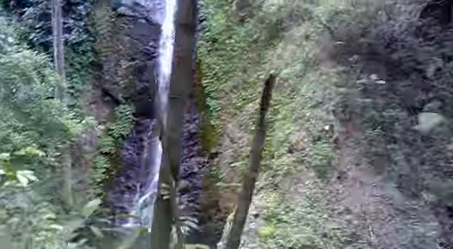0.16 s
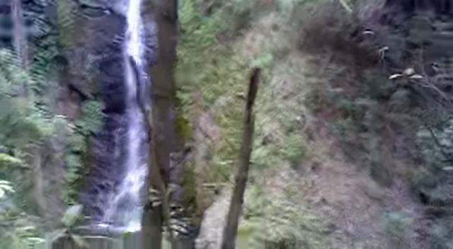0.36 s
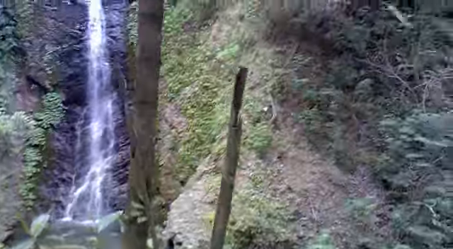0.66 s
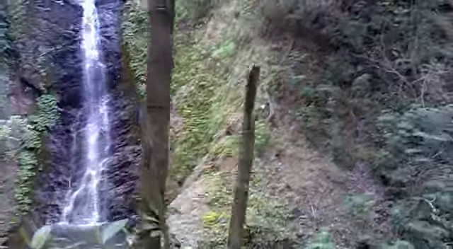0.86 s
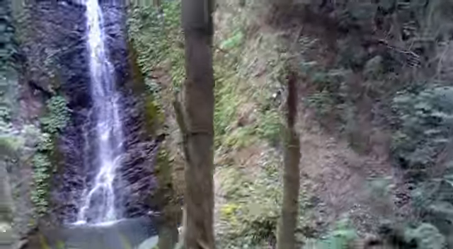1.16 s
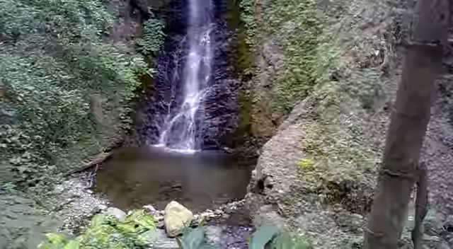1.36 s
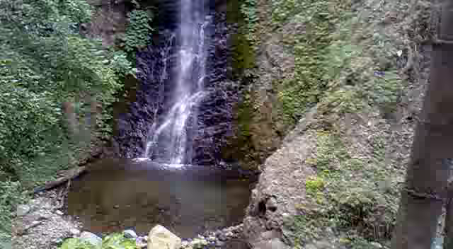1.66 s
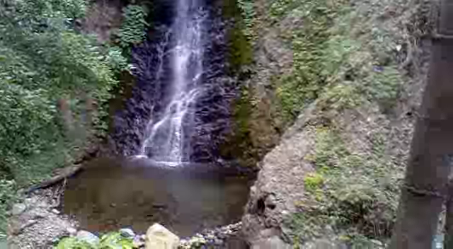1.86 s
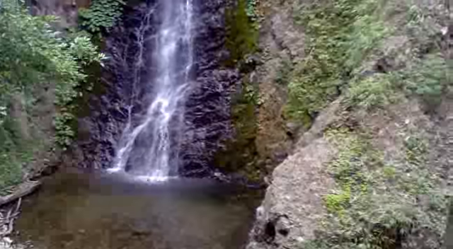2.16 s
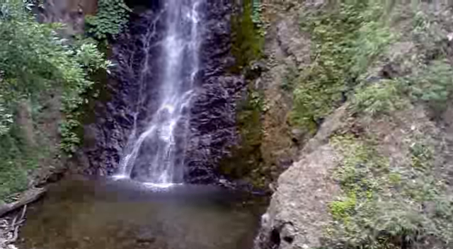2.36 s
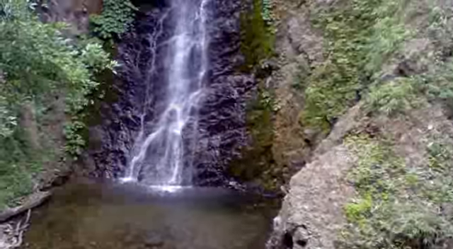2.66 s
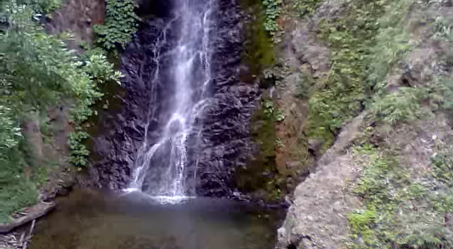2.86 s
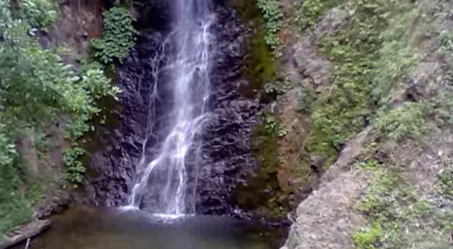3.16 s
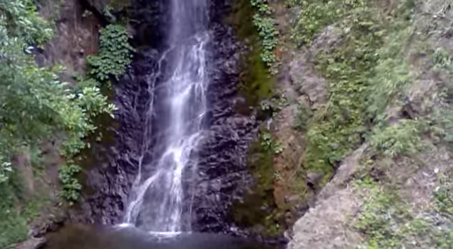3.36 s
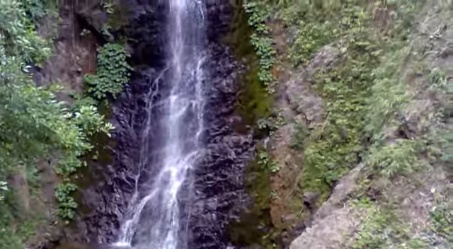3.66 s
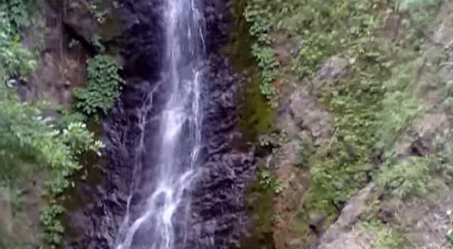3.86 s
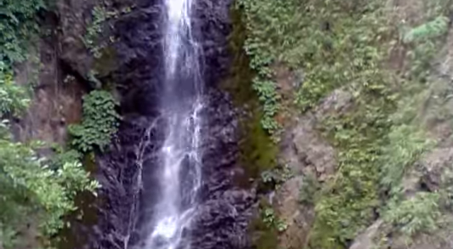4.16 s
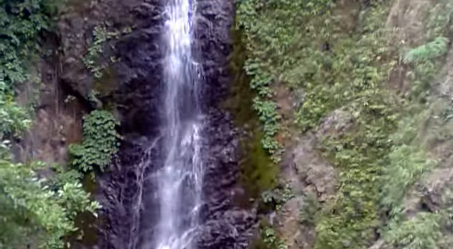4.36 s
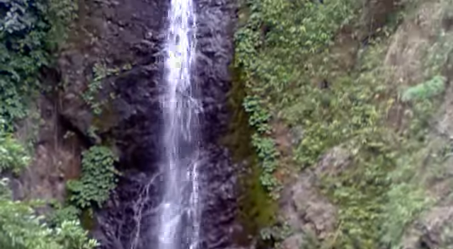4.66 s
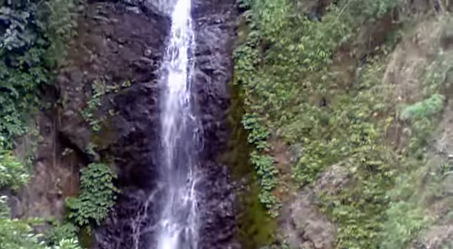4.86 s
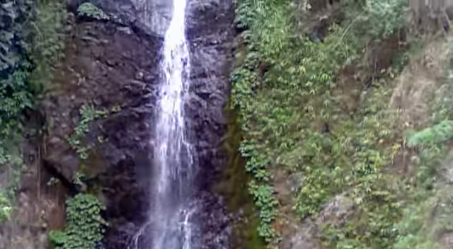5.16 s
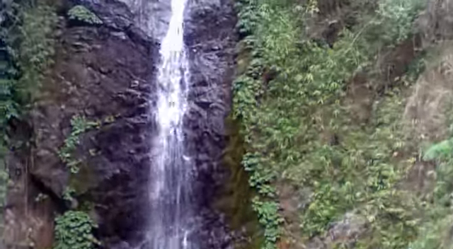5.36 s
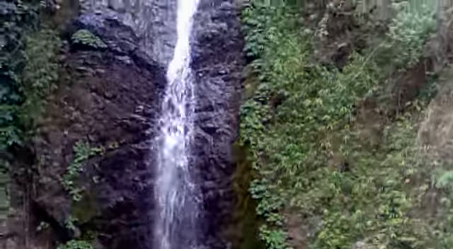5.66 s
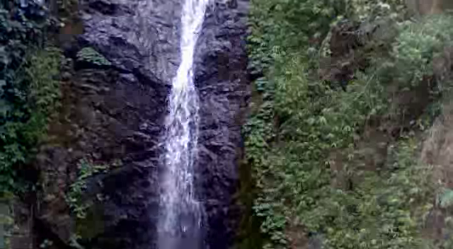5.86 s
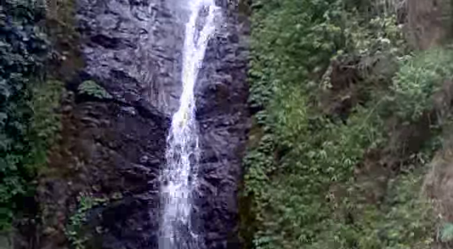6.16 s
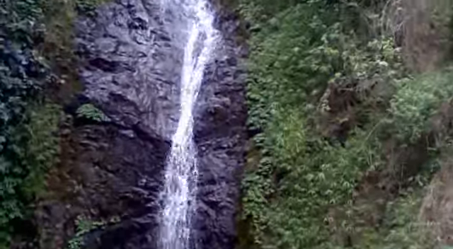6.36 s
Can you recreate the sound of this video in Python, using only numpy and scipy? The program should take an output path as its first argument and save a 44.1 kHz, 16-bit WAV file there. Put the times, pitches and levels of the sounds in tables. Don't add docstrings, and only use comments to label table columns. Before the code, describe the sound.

From the start a tall thin waterfall gives a steady, dense hiss, strongest around the middle and upper-middle range, with fine splashing grains and slight uneven flutter; a tiny swell comes at 0.15 s and a barely felt bump at 0.4. From 0.9 s it fades out, with a small surge and a quick cluster of four dry plastic clicks near 1.1. It is almost silent at 1.4, then the same fall fades in from closer, full by 1.9. Soft low thuds of fingers on the camera body come at 1.9 and 2.1, fainter at 2.9, then at 4.06, 5.3 and 5.65. A small click falls at 3.65 and a faint tick at 5.94. The water keeps rushing evenly to the end, about 6.5 s. Small near-mono microphone, extreme treble missing, slight compressed flicker in the highs, only brief side-to-side differences.

```python
import sys
import numpy as np
from scipy import signal
from scipy.fft import rfft, irfft
from scipy.io import wavfile
from scipy.ndimage import uniform_filter1d

SR = 44100
rng = np.random.default_rng(int(sys.argv[2]) if len(sys.argv) > 2 else 0)


def transcribe(u):
    v = np.clip(np.atleast_2d(u).T, -1, 1)
    q = np.round(v * 32767).astype(np.int16)
    wavfile.write(sys.argv[1], SR, q)


def gain_from_db(level_db):
    decades = np.asarray(level_db, float) / 20
    return 10 ** decades


N = 286650

# pitch_hz, level_db (dB per Hz)
NEAR_COLOUR = [(18, -41), (30, -9.5), (130, -15), (257, -11.5), (423, -12.5), (695, -6.5), (1930, -0.5),
               (2260, -4), (3180, -8.5), (4130, -2), (4580, -3), (5360, -11.5), (8600, -19), (11500, -22),
               (15700, -27)]
# time_s, level_db
FADER = [
    (.9, 0),
    (1.402, -49),
    (1.902, 0),
]
USUAL_DB = -48
STFT = dict(fs=SR, nperseg=2048, noverlap=1792)


def evened(x):
    return x / np.sqrt(np.mean(x ** 2) + 1e-30)


def read(points, hz):
    f, value = np.transpose(points)
    return np.interp(np.log(hz + 1), np.log(f + 1), value)


def add(mix, s, sound):
    part = mix[round(s * SR) - len(sound) // 2:][:len(sound)]
    part += sound[:len(part)]


def hump(hz, centre_hz, octaves):
    return np.exp(-.5 * (np.log2((hz + 1) / centre_hz) / octaves) ** 2)


def smooth_noise(shape, first, second):
    noise = uniform_filter1d(rng.standard_normal(shape), size=first, axis=0)
    return uniform_filter1d(noise, size=second, axis=1)


def splashes(per_s=5000, spread_db=0.5, cycles=6.0):
    out, t = np.zeros(N), np.arange(600) / SR
    for hz in np.geomspace(500, 15000, 30):
        struck = rng.random(N) < per_s / 30 / SR
        sizes = gain_from_db(spread_db * np.minimum(rng.exponential(1, N), 5)) * struck
        turns = hz * t * (1 + 0.049 * hz * t / cycles)
        grain = np.sin(2 * np.pi * turns) * hz * t * np.exp(-3 * hz * t / cycles)
        out += signal.oaconvolve(sizes * rng.choice([-1, 1], N), grain * hz)[:N]
    return evened(out)


def whitened(z):
    power = (abs(z) ** 2).mean(1)
    return z / np.sqrt(uniform_filter1d(power, size=9))[:, None]


def falling_water():
    hz, t, grains = signal.stft(splashes(), **STFT)
    wash = signal.stft(rng.standard_normal(N), **STFT)[2]
    share = 0.35 * hump(hz, 1800, 1.12)[:, None]
    return hz, t, np.sqrt(share) * whitened(grains) + np.sqrt(1 - share) * whitened(wash)


def spot_colour(hz, t):
    # pitch_hz, level_db (dB per Hz)
    far_colour = [(18, -43), (30, -22), (49, -8.5), (134, -14.5), (231, -12.5), (371, -13), (660, -8),
                  (793, -9.5), (977, -5.5), (2040, -0.5), (2710, -8), (4710, -4), (5360, -12), (8160, -17),
                  (15700, -30.5)]
    # centre_hz, width_octaves, level_db
    resonances = [(45, .15, 3), (67, 0.14, -10.5), (586, .08, 1), (2030, 0.037, 1), (3750, 0.063, 1.4),
                  (4460, .06, 0), (5830, 0.034, 1), (5250, 0.033, -0.5), (11400, 0.042, 1)]
    detail_db = sum(db * hump(hz, centre, octaves) for centre, octaves, db in resonances)
    far = evened(gain_from_db(read(far_colour, hz) + detail_db))
    near = evened(gain_from_db(read(NEAR_COLOUR, hz) + detail_db))
    return np.where(t < FADER[1][0], far[:, None], near[:, None])


def flow_level(t):
    # time_s, level_db
    flow_far = [
        (0.0, -49.5),
        (0.154, -47.5),
        (0.218, -50),
        (0.88, -49),
    ]
    # time_s, level_db
    flow_near = [(1.92, -49), (2.15, -47), (2.3, -49), (2.39, -47), (2.42, -48), (4.47, -48), (4.51, -47),
                 (4.66, -48.5), (5.26, -47), (5.77, -48.5), (5.84, -47.5), (6.18, -47), (6.36, -48),
                 (6.5, -49)]
    flow_db = np.interp(t, *np.transpose(flow_far + flow_near)) - USUAL_DB
    rustle_s, rustle_db, rustle_half_s = 1.145, 3, .06
    return flow_db + rustle_db * np.exp(-((t - rustle_s) / rustle_half_s) ** 2)


def wandering(hz, t):
    # centre_hz, width_octaves, swing_db
    parts = [
        (1800, 0.3, 0.88),
        (10000, 0.42, 0.06),
        (890, .85, 0.57),
    ]
    drifts = smooth_noise((len(t), 3), 20, 1)
    lift_db = 0
    for (centre, octaves, db), drift in zip(parts, drifts.T):
        drift = uniform_filter1d(drift, size=12)
        lift_db = lift_db + db * evened(drift) * hump(hz[:, None], centre, octaves)
    return lift_db


def waterfall(patchy_db=0.44, gust_db=0.44):
    hz, t, z = falling_water()
    patches = evened(smooth_noise(z.shape, 24, 16))
    gusts = uniform_filter1d(uniform_filter1d(rng.standard_normal(len(t)), size=8), size=6)
    gusts = evened(gusts)
    level_db = 1.1 * flow_level(t) + patchy_db * patches + gust_db * gusts + wandering(hz, t)
    water = signal.istft(z * spot_colour(hz, t) * gain_from_db(level_db), **STFT)[1][:N]
    return gain_from_db(USUAL_DB) * evened(water)


def handling():
    # time_s, peak_db, pitch_hz, length_cycles, shell_knock_db
    bumps = [
        (0.439, -62, 120, 1.1, -20),
        (1.925, -52.5, 330, 1.2, -4),
        (2.096, -45, 215, 0.62, -10),
        (2.111, -53, 280, 0.67, 1),
        (2.932, -55, 160, 0.69, -8),
        (4.0606, -46.5, 211, 0.48, -6),
        (5.308, -46, 225, 0.69, -15),
        (5.641, -52, 200, 0.71, -15),
    ]
    # time_s, peak_db, ring_hz, decay_s (to -60 dB)
    clicks = [
        (1.087, -38, 1500, .015),
        (1.097, -35, 1900, .02),
        (1.110, -29.5, 1270, 0.0087),
        (1.128, -35, 1900, .015),
        (1.78, -51, 4000, .01),
        (3.645, -52, 10500, .01),
        (3.656, -52, 10800, .01),
        (3.654, -40.5, 950, .02),
        (3.13, -55, 8000, .008),
        (5.94, -48, 4300, .01),
    ]
    out, t = np.zeros(N), np.arange(-900, 901) / SR
    for s, db, hz, cycles, knock_db in bumps:
        fall = np.where(t < 0, 1.6, 1.0) * t * hz / cycles
        turns = hz * t * np.exp(-.15 * hz * t)
        push = np.cos(2 * np.pi * turns) * np.exp(-fall ** 2)
        knock = gain_from_db(knock_db) * np.cos(2 * np.pi * 540 * t) * np.exp(-(t / 0.0024) ** 2)
        add(out, s, gain_from_db(db) * (push + knock))
    after = np.maximum(t, 0)
    for s, db, hz, decay_s in clicks:
        onset = np.minimum(after / 0.00026, 1)
        add(out, s, gain_from_db(db - 60 * after / decay_s) * np.sin(2 * np.pi * hz * after) * onset)
    return out


def scene():
    return np.tile(waterfall() + handling(), (2, 1))


def treble_dropouts(x, from_hz=10000, top_hz=15740, most=1.6, depth_db=-36):
    hz, t, z = signal.stft(x, SR, nperseg=1024, noverlap=768)
    luck = evened(smooth_noise(z.shape, 4, 16))
    bar = most + 1.1 * np.clip((top_hz - hz) / (top_hz - from_hz), 0, 9)[:, None] ** 2
    lost = np.clip((luck - bar) * 8 + .5, 0, 1)
    z = z * gain_from_db(depth_db * lost) * (hz[:, None] < top_hz)
    return signal.istft(z, SR, nperseg=1024, noverlap=768)[1][:N]


def ear_differences():
    # time_s, low_hz, high_hz
    bands = [(.378, 12400, 13800), (.425, 12400, 13800), (.705, 6200, 7600), (.775, 4200, 5670),
             (.775, 12400, 13800), (1.078, 6900, 9000), (2.26, 13800, 15200), (2.563, 4210, 5670),
             (2.563, 11700, 13100), (3.075, 8300, 9700), (3.167, 7600, 10400), (3.585, 9000, 11700),
             (3.91, 4150, 5200), (3.91, 5700, 6900), (4.63, 4600, 5700), (4.63, 8300, 9700),
             (5.49, 14500, 15700), (5.93, 4600, 6300), (5.93, 9000, 12500), (5.93, 13100, 14500),
             (6.465, 9000, 10400), (6.465, 14500, 15700)]
    out, hz = np.zeros(N + 2048), np.fft.rfftfreq(1280, 1 / SR)
    noise = rfft(rng.standard_normal((len(bands), 1280))) * evened(gain_from_db(read(NEAR_COLOUR, hz)))
    for (s, low_hz, high_hz), puff in zip(bands, noise):
        puff = irfft(puff * (hz > low_hz) * (hz < high_hz))
        add(out, s, gain_from_db(-50.5) * puff * signal.windows.tukey(1280, .5))
    return out[:N] * np.array([[1], [-1]])


def low_pass(x):
    return signal.sosfilt(signal.butter(12, 15900, fs=SR, output="sos"), x)


def record(dry):
    offset = -.00032
    s, db = np.transpose(FADER)
    fader = gain_from_db(np.interp(np.arange(N) / SR, s, db))
    faded = (treble_dropouts(dry[0]) + offset + ear_differences()) * fader
    hiss = gain_from_db(-104) * rng.standard_normal(N)
    return low_pass(faded + hiss)


dry = scene()
out = record(dry)
transcribe(out)
```